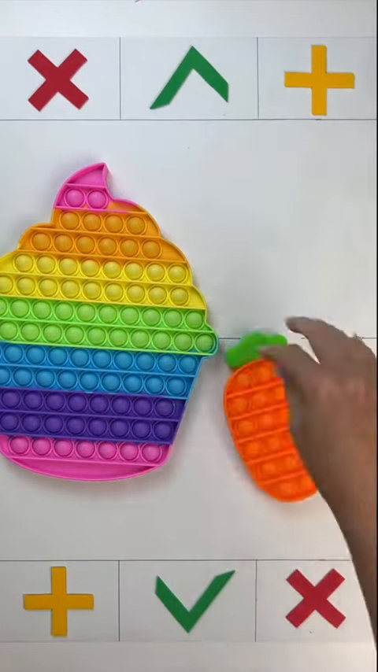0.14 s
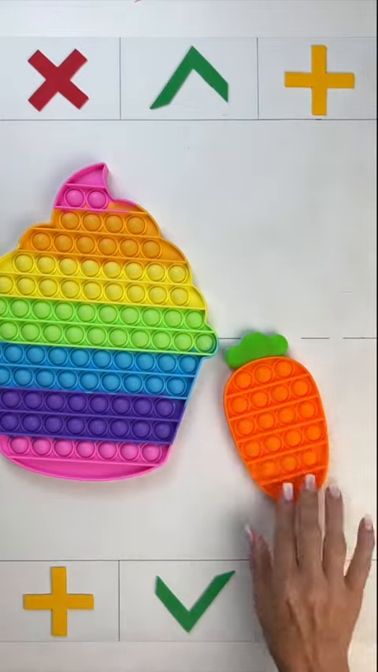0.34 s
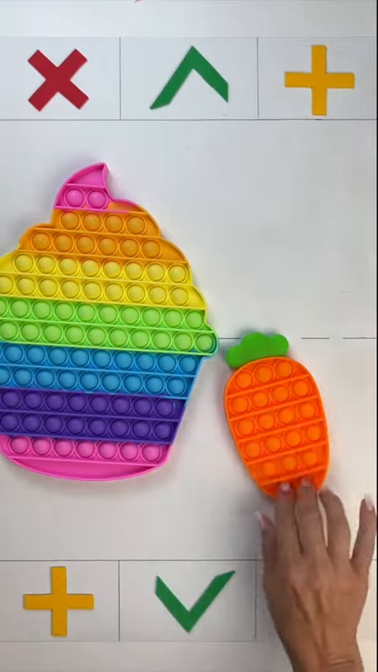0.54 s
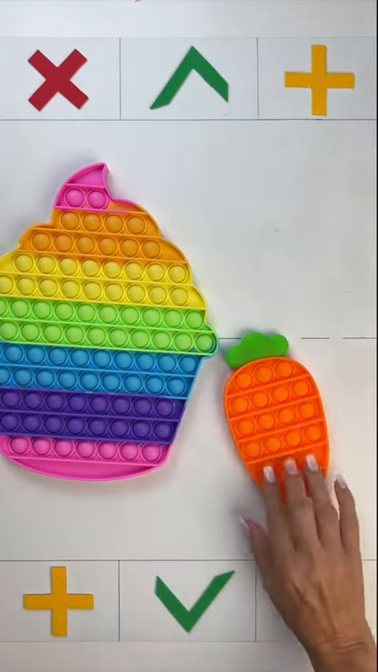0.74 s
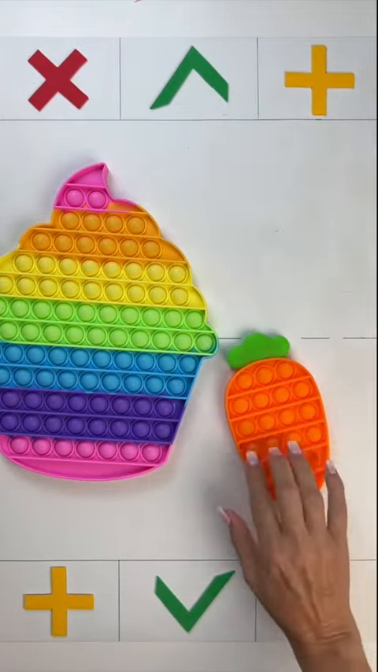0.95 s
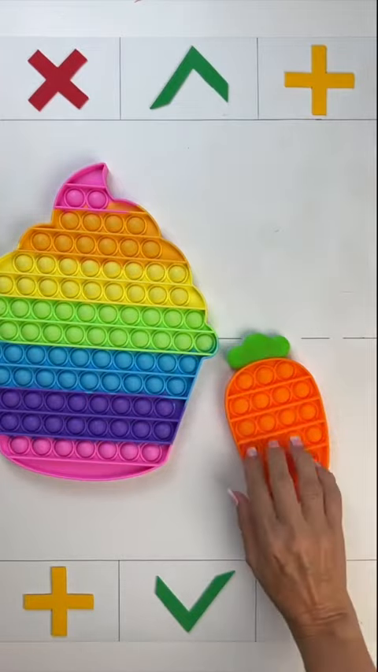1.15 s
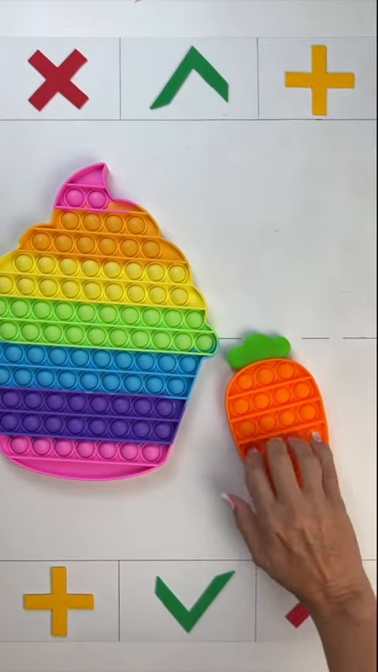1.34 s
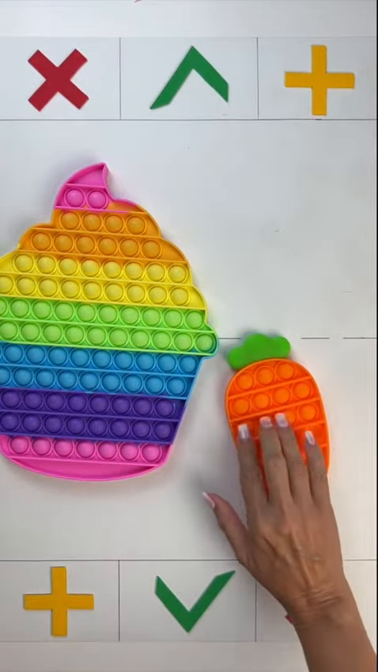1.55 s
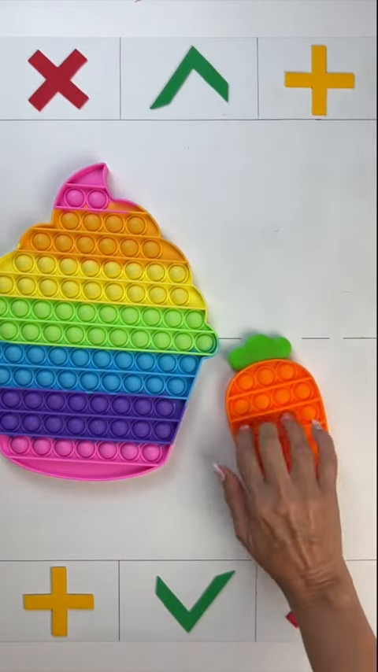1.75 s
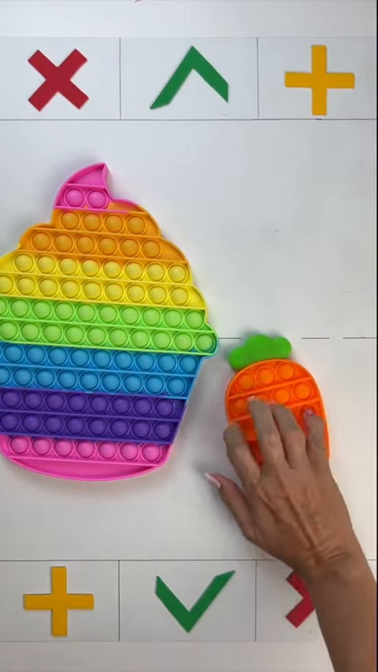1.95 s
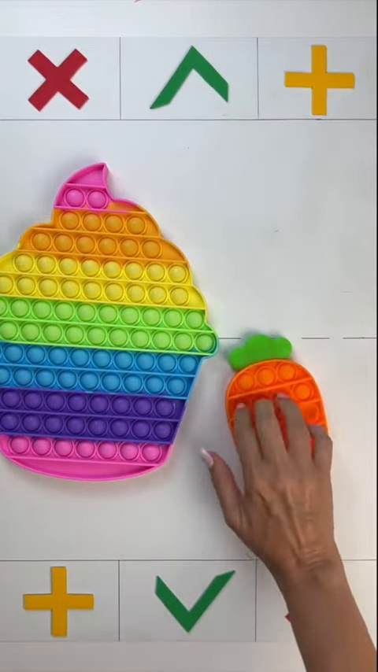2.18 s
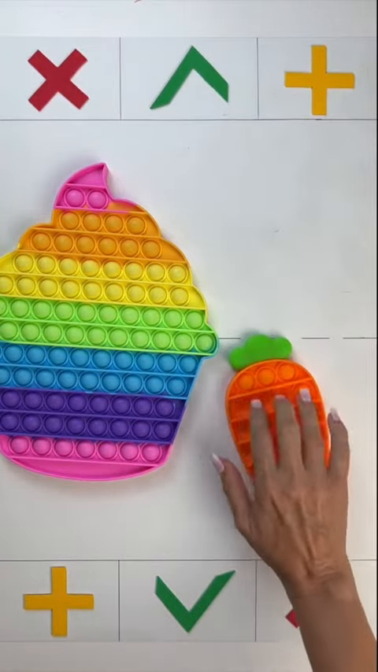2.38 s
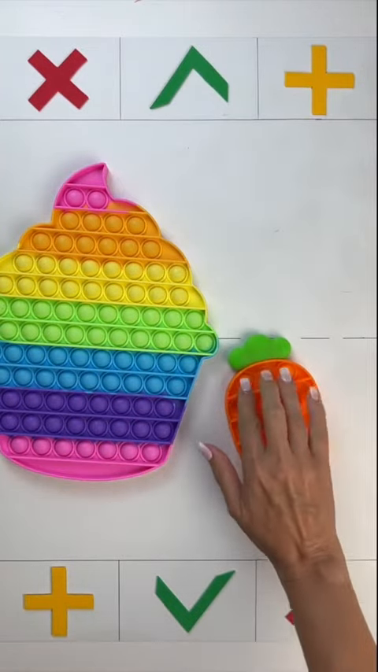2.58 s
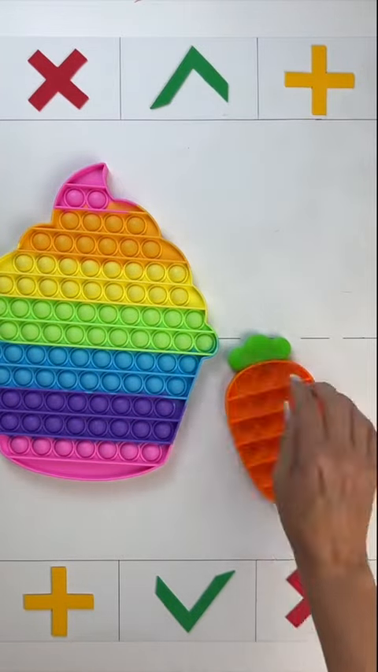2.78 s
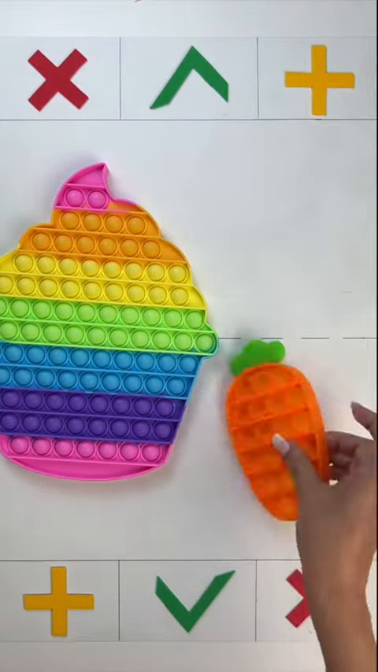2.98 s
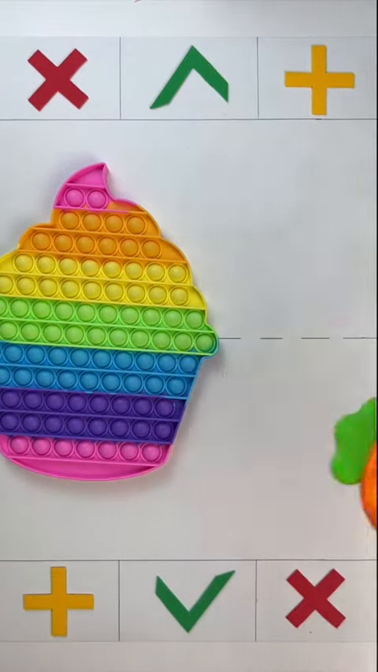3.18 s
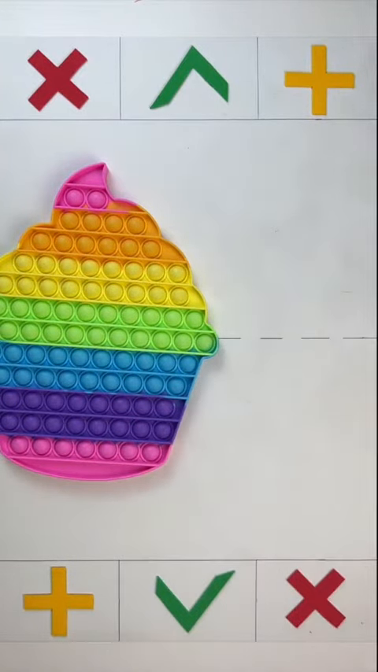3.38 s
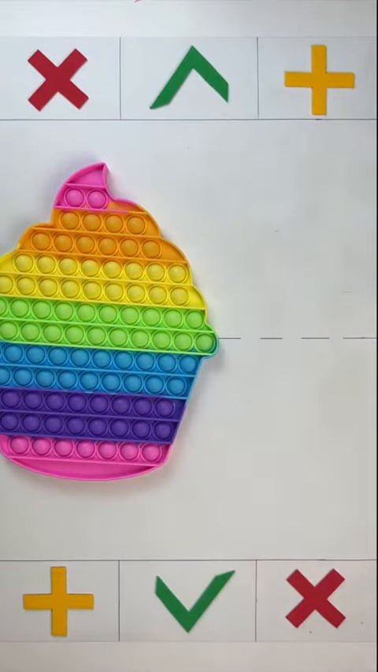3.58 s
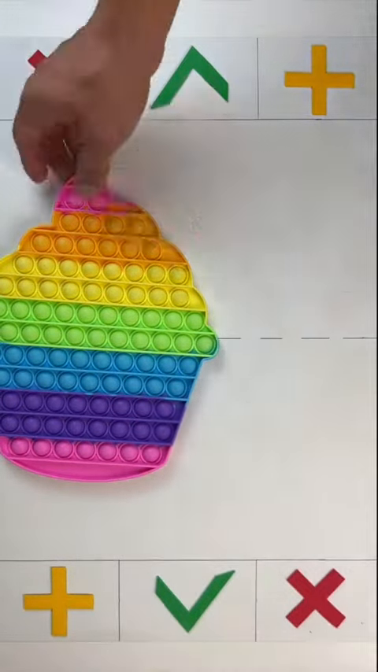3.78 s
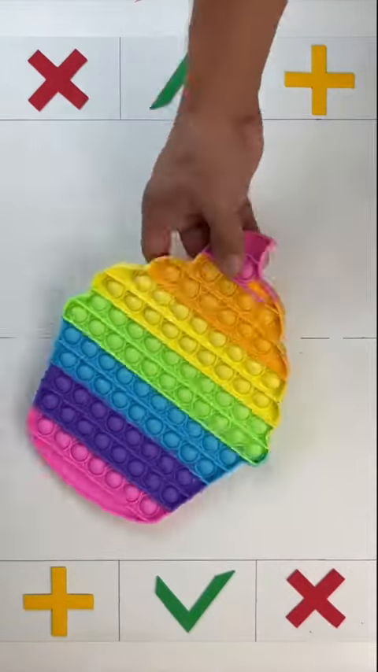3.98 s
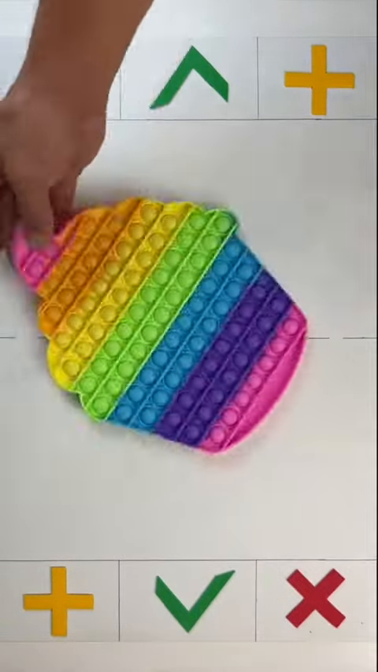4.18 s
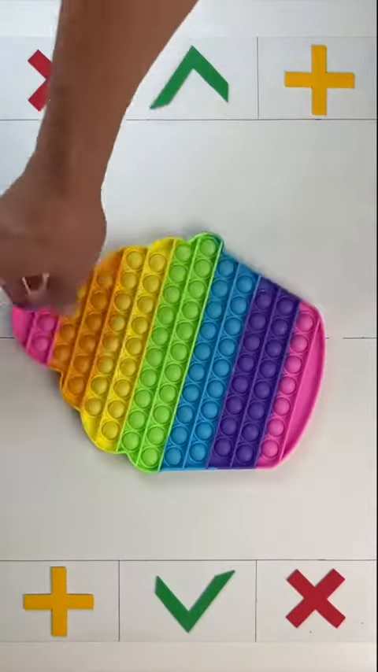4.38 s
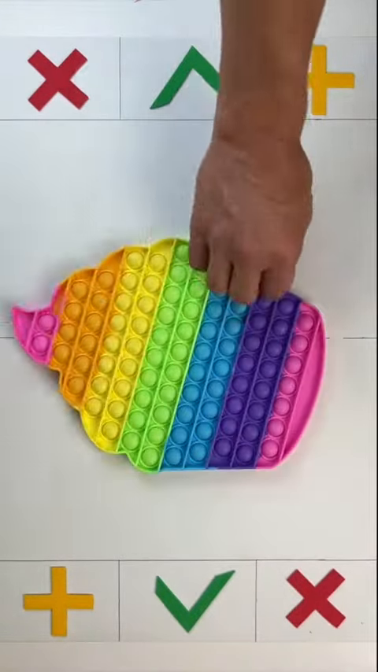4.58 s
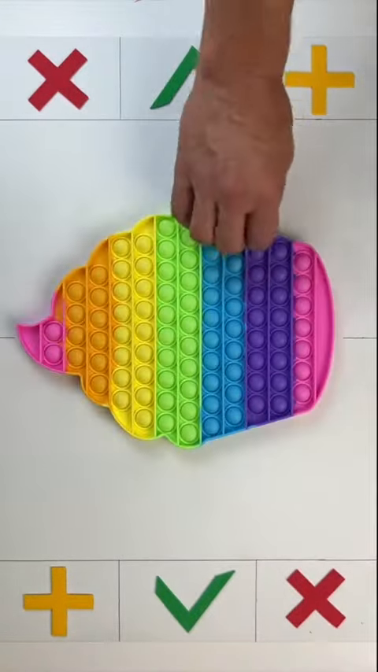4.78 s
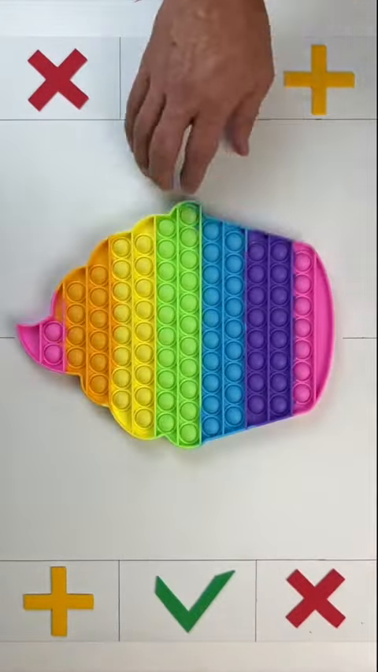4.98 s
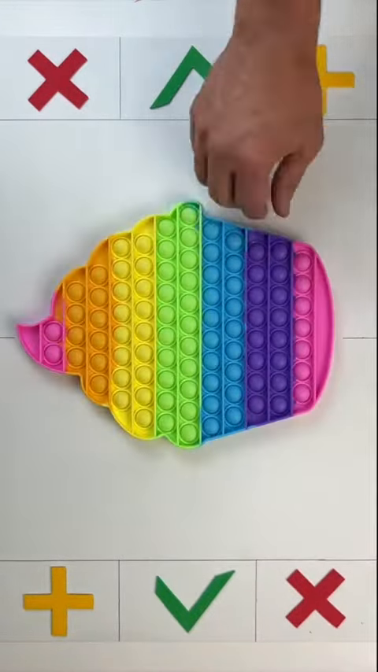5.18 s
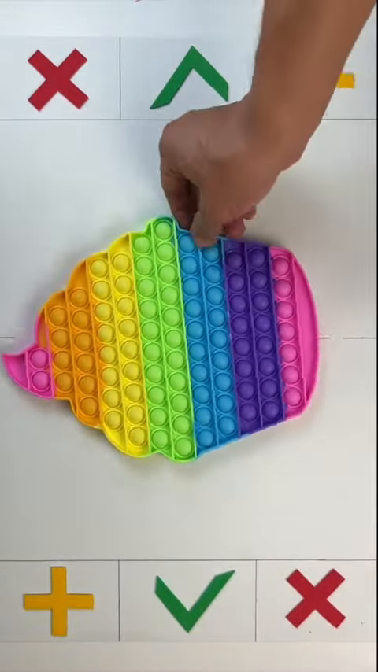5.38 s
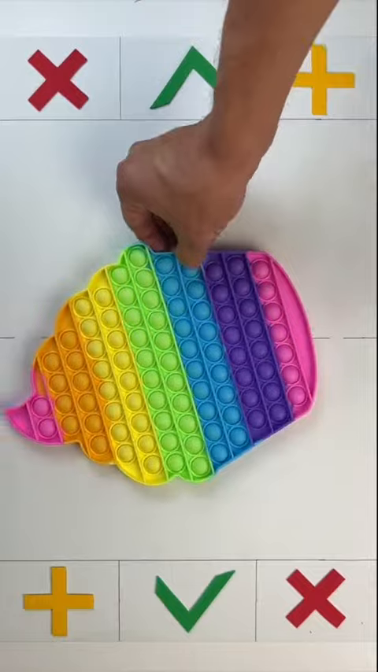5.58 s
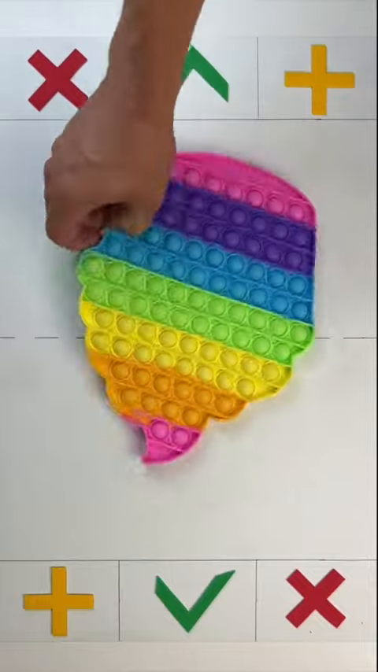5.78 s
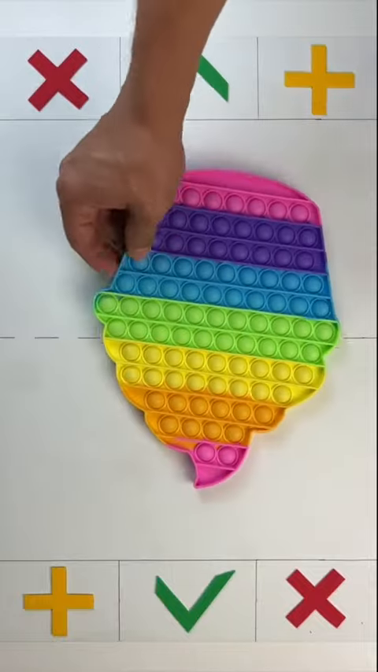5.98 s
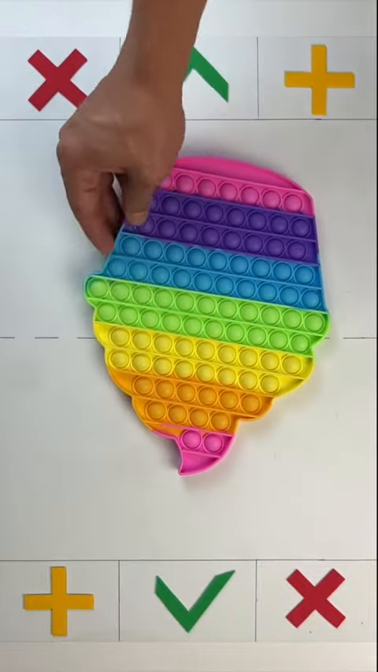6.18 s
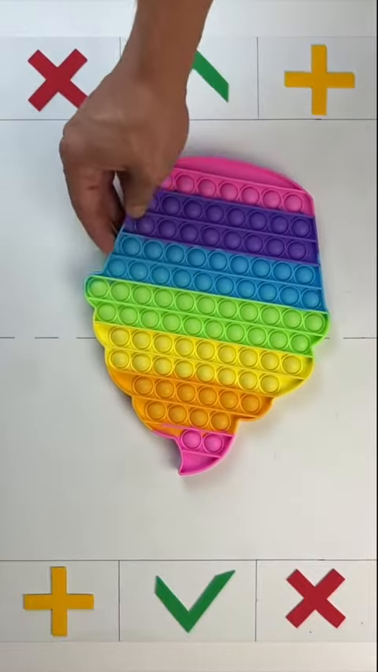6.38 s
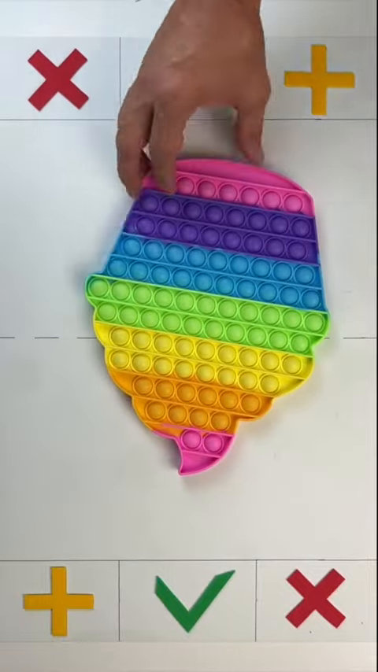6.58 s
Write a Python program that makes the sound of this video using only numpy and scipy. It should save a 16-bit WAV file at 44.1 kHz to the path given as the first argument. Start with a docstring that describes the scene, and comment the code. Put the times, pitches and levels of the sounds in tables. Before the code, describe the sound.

A low, wavering hum and soft air fill a small room throughout, heard from close above a table. At 0.03 s comes a snap, then at 0.1 s the small silicone toy lands with a loud smack. Bubbles pop from about 0.45 s, sharp and resonant with quick falling chirps: strong ones at 0.8, 1.15 (a tight cluster), 1.4, 1.7, 1.9, 2.2 and 2.4, ending with a double snap at 2.7. Faint fingertip pats fill the gaps, some with low puffs of air. Dull knocks and tiny nail ticks follow around 2.85-3.1, then near quiet. A soft brush at 3.6 leads to gritty rubber squeaks and swishes from 3.8 to 4.4, a hard knock at 4.37, weaker skids, and a thud at 4.8. After a pause, skids resume at 5.3, strongest near 5.6-5.7, fading by 6.2. A final firm double knock comes at 6.42, then hum.

```python
"""Bubble toy popped, a larger toy dragged

A silicone toy lands on a table and fingers pop its bubbles; then a larger toy is dragged round and let drop.
Each snap is a resonant burst that the table top smears into a quick falling chirp and colours with its modes.
Skids are uneven trains of stick-slip jerks; drags add grainy swishes, and filtered bursts make the knocks.
A small, diffusely echoing room with a low wavering hum and soft air surrounds a microphone above the table."""
import sys
import numpy as np
from scipy import signal
from scipy.fft import rfft, irfft
from scipy.io import wavfile
from scipy.ndimage import uniform_filter1d

SR = 44100
rng = np.random.default_rng(int(sys.argv[2]) if len(sys.argv) > 2 else 0)


def waveform_to_disk(signal):
    """Save audio, clipped to [-1, 1], as 16-bit WAV at the path in sys.argv[1]."""
    frames = np.transpose(np.atleast_2d(signal))
    scaled = np.clip(frames, -1, 1) * 32767
    samples = np.round(scaled).astype(np.int16)
    wavfile.write(sys.argv[1], SR, samples)


N = 292824

LEAD_S = 0.005  # room ahead of each snap for its earliest treble
SKID_FADE_S = 0.016  # margin at either end of a skid, in which it swells and dies away


def undb(db):
    """Decibels to amplitude factor."""
    return 10 ** (np.asarray(db) / 20)


def unit(x):
    """The same sound at rms 1."""
    return x / np.sqrt(np.mean(x ** 2) + 1e-18)


def bins(size):
    """Frequencies of a real FFT in Hz, kept above zero."""
    return np.maximum(np.fft.rfftfreq(size, 1 / SR), 1)


def colour(x, points):
    """Filter by a spectrum of (f/Hz, gain/dB) points, joined along log frequency."""
    hz, db = np.transpose(points)
    gain_db = np.interp(np.log(bins(len(x))), np.log(hz), db)
    return irfft(rfft(x) * undb(gain_db), len(x))


def resonance(f, hz, q):
    """Response of one damped resonance, 1 at its centre."""
    return 1 / (1 + 1j * q * (f / hz - hz / f))


def walk(rate, size):
    """Random wander with spread near 1: straight lines between `rate` random knots per second."""
    knots = rng.standard_normal(int(size * rate / SR) + 2)
    return np.interp(np.arange(size) * rate / SR, np.arange(len(knots)), knots)


def add(track, s, x):
    """Mix x into the track from time s on, trimming what falls outside."""
    start = int(s * SR)
    x = x[max(-start, 0):]
    start = max(start, 0)
    track[start:start + len(x)] += x[:len(track) - start]


def tabletop(x, ring_db, spot_db=2, load=0.019):
    """The table top passes a push on and rings; the spot sets each mode's share, the hand's load its pitch."""
    # modes of the table top with the toy on it: f/Hz, gain/dB (before the ring level), 60 dB decay time/s
    modes = [(140, -4, 0.31), (260.5, -2, 0.15), (263.7, 14.5, .13), (395, 12.5, 0.099), (768, 4.5, 0.047),
             (903, 3.5, 0.052), (1174, -4.5, 0.077), (1446, 0.5, 0.039), (1678, -4.5, .08),
             (1731, -9, 0.11), (1881, -9.5, 0.092), (2670, 4, 0.11), (3340, -2, 0.036)]
    t = np.arange(SR // 4) / SR
    ring = np.zeros(len(t))
    for hz, db, t60 in modes:
        spot, shift = rng.standard_normal(2)
        decay = np.log(1000) / t60
        share = undb(db + ring_db + spot_db * spot) * 2 * decay / SR
        loaded_hz = hz * (1 + load * shift)
        ring += share * np.exp(-decay * t) * np.cos(2 * np.pi * loaded_hz * t)
    ring[0] += 1  # the push itself
    return signal.fftconvolve(x, ring)


def room(x, gap_s=0.0058, t60_s=0.3, early_db=7, early_s=0.012, wet_db=-1):
    """Strong near reflections, then a short diffuse tail, its width set per frequency; stereo out."""
    # spectrum of the echo: f/Hz, mid level/dB (before the wet level), side minus mid/dB
    echo_colour = [(99, 1, -25), (294, -10, -37), (580, -10.5, -19.5), (1126, -8.5, -5), (2260, -11, 3),
                   (5030, -8.5, -11), (9300, -8, -0.5), (15000, -9.5, -1)]
    size = SR // 2
    t = np.arange(size) / SR
    tail = np.exp(-np.log(1000) * t / t60_s)
    early = undb(early_db) * np.exp(-t / early_s)
    fade = (t > gap_s) * tail * (1 + early)
    mid = colour(rng.standard_normal(size), [(hz, db) for hz, db, _ in echo_colour])
    side = colour(rng.standard_normal(size), [(hz, db + side_db) for hz, db, side_db in echo_colour])
    echo = undb(wet_db) * fade / np.linalg.norm(fade) * np.array([mid + side, mid - side])
    return x + signal.fftconvolve(x[None], echo, axes=1)[:, :len(x)]


def background(waver_db=3, drift=0.053, side_db=-20, air_db=-52.5):
    """Hum partials wander in pitch and level over the soft, nearly mono air noise of the room."""
    # partials of the hum: f/Hz, rms level/dB
    hum_partials = [(141, -50.5), (237, -63), (301, -58), (400, -66.5)]
    # spectrum of the room air: f/Hz, relative level/dB
    air_colour = [(15, -65.5), (25, -38.5), (111, -11.5), (145, -2), (206, -21), (301, -10), (373, -29),
                  (405, -18.5), (1700, -43), (3250, -41), (16000, -56.5)]
    hum = np.zeros(N)
    for hz, db in hum_partials:
        phase = 2 * np.pi * np.cumsum(hz * (1 + drift * walk(25, N))) / SR
        hum += undb(db) * unit(np.sin(phase) * undb(waver_db * walk(11, N)))
    mid = unit(colour(rng.standard_normal(N), air_colour))
    side = unit(colour(rng.standard_normal(N), air_colour))
    air = mid + undb(side_db) * side * np.array([[1], [-1]])
    return hum + undb(air_db) * air


def pop(hz, thump_db, crack_db, size=4096, q=1.65, soft=2.63, slap_db=-5, slap_s=0.0024,
        snap_spread=0.07864, thump_spread=0.22, thump_hz=480, thump_q=0.62, puff_db=-14, puff_hz=75,
        knee_hz=250, front_hz=3500, crinkle_db=-7, crinkle_s=0.0056, crack_s=0.004):
    """A dome flips: a snap with slap and crinkle of tiny slips, a thump, a puff of air and a fine crack."""
    # spectrum of the crack: f/Hz, relative level/dB
    crack_colour = [(500, -16.5), (2000, 2), (4000, 6), (6500, -3), (10500, -6), (12500, -4), (15500, -6.5)]
    f, t = bins(size), np.arange(size) / SR
    # bending waves: travel time falls as about 1 / sqrt(f), so the treble arrives first
    bend = -2j * np.pi * (2 * np.sqrt(f + knee_hz) - f / np.sqrt(front_hz + knee_hz))

    slips = rng.standard_normal(size) ** 3 * np.exp(-t / crinkle_s)
    crinkle = undb(crinkle_db) * rfft(slips) / np.linalg.norm(slips)
    # the dome slaps the table an instant later; the gap gives each pop its own colour
    gap_s = slap_s * (0.5 + rng.random())
    slap = undb(slap_db) * np.exp(-2j * np.pi * f * gap_s)
    push = 1 + slap + crinkle

    # the snap comes almost straight from the dome; a lower one is also softer
    edge = f / (soft * hz)
    snap = resonance(f, hz, q) / (1 + 1j * edge - edge ** 2) / (1 + 1j * f / (2 * hz))
    snap = snap * np.exp(snap_spread * bend)
    # the thump has crossed the table top
    thump = resonance(f, thump_hz, thump_q) / (1 + 1j * f / hz) ** 2 * np.exp(thump_spread * bend)
    puff = undb(puff_db) * resonance(f, puff_hz, 0.93) ** 2

    spectrum = snap * push + undb(thump_db) * (thump + puff)
    wave = irfft(spectrum * np.exp(-2j * np.pi * f * LEAD_S)) / np.abs(irfft(snap)).max()
    crack = unit(colour(rng.standard_normal(size) ** 3, crack_colour))
    crack = crack * (t > LEAD_S) * np.exp(-np.abs(t - LEAD_S) / crack_s)
    return wave + undb(crack_db - 1) * crack


def strike(db, hz, thump_db, crack_db, ring_db=0):
    """One flip or knock at a given level, heard through the table top."""
    return undb(db) * tabletop(pop(hz, thump_db, crack_db), ring_db)


def pops(level_db=-2):
    """Landing, bubbles and follow-on snaps: a soft click, a slip and the snap itself, each event with its own echo."""
    # the toy landing (at .1075 s), bubbles snapping through and their follow-on snaps:
    # snap t/s, level/dB (before the layer level), snap centre f/Hz,
    # thump and crack/dB relative to the snap (the crack before a trim), lead of the soft click/s
    snaps = [(0.0328, -9, 1400, -0.5, -24, 0.0033), (.1075, 4.5, 1300, 1.5, -17, 0.0038),
             (.443, -16, 2050, 5.5, -11.5, 0.0015), (0.4892, -8.5, 2180, 1.5, -9, 0.021),
             (.7888, 0.5, 1970, -1.5, -12, 0.016), (0.7997, -3.5, 1460, -2.5, -10, 0.0036),
             (1.139, -15.5, 1150, 6, -20, 0.0072), (1.148, -3.5, 1740, -1.5, -8, 0.0069),
             (1.1542, -2.5, 1920, 0.5, -14, 0.011), (1.1644, -5.5, 1580, -7.5, -8, 0.00031),
             (1.383, -1, 2526, -6.5, -15, 0.023), (1.6679, 1.5, 1790, -5, -10, .0135),
             (1.9293, -5, 1950, -10, -14.5, 0.02), (2.169, -11, 1670, -11.5, -9, .0065),
             (2.175, 1, 1860, -0.5, -12.5, 0.0037), (2.18, -1.5, 1860, -3, -8.5, 0),
             (2.419, 2.5, 1990, -6, -12, 0.0097), (2.6789, -5.5, 1620, 6.5, -4.5, 0.0078),
             (2.6903, 0, 1600, -5, -12, 0.0059)]
    lead_in_s = 0.05  # time kept before each snap for the click, in a bubble the start of its buckling
    click_db, click_under_db, click_hz = -18.5, -8.5, 1350  # usual level, highest relative to the snap
    slip_s, slip_db = 0.0045, -19.5  # longest lead of the slip, its level relative to the snap
    out = np.zeros((2, N))
    snap_s = lead_in_s - LEAD_S
    for s, db, hz, thump_db, crack_db, click_s in snaps:
        soft_db = min(click_db, db + click_under_db) + level_db
        click = strike(soft_db, click_hz, thump_db=-2, crack_db=-22.5)
        slip = strike(db + slip_db + level_db, hz, thump_db=-13, crack_db=-8.5)
        snap = strike(db + level_db, hz, thump_db, crack_db)
        event = np.zeros(SR // 2)
        add(event, snap_s - click_s, click)
        add(event, snap_s - min(slip_s, click_s), slip)
        add(event, snap_s, snap)
        for channel, heard in zip(out, room(event)):
            add(channel, s - lead_in_s, heard)
    return out


def whumps(size=4096, hz=42, q=1.1):
    """The landing and a few of the presses push air from under the toy: a slow, heavily damped low swing."""
    # air pushed out at the microphone: t/s, peak level/dB
    air_pushes = [(0.106, -35.5), (0.791, -42.5), (2.173, -30.5), (2.688, -40)]
    out = np.zeros(N)
    wave = irfft(resonance(bins(size), hz, q) ** 2)
    for s, db in air_pushes:
        add(out, s, undb(db) * wave / np.abs(wave).max())
    return out


def touches(top_db=-45, range_db=6, hz=850, thump_db=0, crack_db=-24, count=22):
    """Fingertips pat and shift on the small toy: faint pops at random times, over an octave of pitch."""
    from_s, to_s = 0.2, 2.95  # when the fingers rest on the toy
    out = np.zeros(N)
    for place, size, pitch in rng.random((count, 3)):
        pat = tabletop(pop(hz * 2 ** (pitch - 0.5), thump_db, crack_db), ring_db=0)
        add(out, from_s + (to_s - from_s) * place, undb(top_db + range_db * (size - 1)) * pat)
    return out


def knocks(level_db=-2):
    """Fingers and toys knock dully on the table, and nails tick brightly: pop bursts ringing the table top."""
    # knocks: t/s, level/dB (before the layer level), centre f/Hz,
    # thump and crack/dB relative to the knock (the crack before a trim)
    table_knocks = [(.265, -29, 885, -1, -19.5), (0.646, -37, 860, 3.5, -18), (.958, -33, 830, 2, -13),
                    (1.504, -35, 794, 8, -30), (1.877, -44, 794, 8.5, -21), (2.006, -35, 1170, 6.5, -10),
                    (2.0307, -17.5, 844, -2, -21), (2.834, -28, 584, 14.5, -8),
                    (2.852, -20.5, 1300, 4.5, -19), (3.354, -46, 1530, 9, -2.5),
                    (4.3657, -4.5, 1527, -9, -33.5), (4.783, -12, 1014, -1.5, -14),
                    (5.2247, -35, 700, 13, -8.5), (6.4228, -14, 1232, -22.5, -31),
                    (6.4255, -5.5, 1047, -2, -16), (6.608, -50, 2064, -15, 3)]
    # fingernails as the small toy is picked up: t/s, level/dB (before the layer level)
    nail_ticks = [(2.949, -30.5), (3.0605, -35), (3.1, -38)]
    out = np.zeros(N)
    for s, db, hz, thump_db, crack_db in table_knocks:
        add(out, s - LEAD_S, strike(db + level_db, hz, thump_db, crack_db))
    for s, db in nail_ticks:
        add(out, s - LEAD_S, strike(db + level_db, hz=3800, thump_db=-7, crack_db=-35))
    return out


def skid(length, start_hz, end_hz, bright_hz, rough, jitter=0.1718, blur=0.33, scatter_db=7, q=1.77,
         soft=1.97, grit=0.92, edge_s=0.0084, flap_hz=230, flap_db=-8, count=14):
    """Stick and slip: a short train of jerks whose spacing and size grow uneven with roughness."""
    n = int((length + 2 * SKID_FADE_S) * SR)
    t = np.arange(n) / SR - SKID_FADE_S
    rate = np.interp(t, [0, length], [start_hz, end_hz]) * np.exp(jitter * rough * walk(150, n))
    # each jerk comes a little early or late, which smears the high overtones
    phase = 2 * np.pi * np.cumsum(rate) / SR + blur * walk(600, n)
    jerks = unit(sum(np.cos(k * phase) / np.hypot(1, k / 4) for k in range(1, count + 1)))
    # other patches of the rim catch out of step, and shake the whole floppy toy
    patches = 2 * grit * np.sqrt(abs(rough)) * unit(rng.standard_normal(n) ** 3)
    swell = (1 + np.tanh(t / edge_s)) * (1 + np.tanh((length - t) / edge_s))
    swell = swell * undb(scatter_db * rough * walk(216.9, n))

    f = bins(2 * n)
    rubber = resonance(f, bright_hz, q) / (1 + 1j * f / (soft * bright_hz)) ** 2
    flap = undb(flap_db) * resonance(f, flap_hz, 1) ** 2
    rim = rfft((jerks + patches) * swell, 2 * n) * rubber
    body = rfft(patches * swell, 2 * n) * flap
    wave = irfft(rim + body)
    return wave / np.sqrt(np.sum(wave ** 2) / (length * SR))  # rms 1 over the nominal length


def skids(level_db=-3, ring_db=-9, grain_db=5):
    """Short squeaky skids with a gritty hiss: each sags in pitch, and the harder ones are brighter."""
    # rubber catching on the table: t/s, length/s, level/dB (before the layer level),
    # mean slip rate f/Hz (before jitter), roughness/0-1
    catches = [(2.978, 0.013, -26.5, 1145, 0.03), (3.792, 0.059, -18, 419.4, 0.29),
               (3.846, .057, -18.5, 333.8, 0.62), (3.933, 0.019, -18, 477, 0.21),
               (3.974, 0.02, -14, 757.5, 0.27), (4.004, 0.017, -13.5, 460, 0.42),
               (4.116, 0.016, -13, 428.8, 0.52), (4.141, 0.012, -19, 785, 0.22),
               (4.203, 0.013, -25, 896, 0.14), (4.245, 0.0337, -15.5, 443.4, 0.41),
               (4.283, .013, -10.5, 529, 0.03), (4.386, 0.038, -20, 339, 0.63),
               (4.609, 0.038, -33, 487, 0.56), (4.657, 0.03, -23, 420.2, 0.54),
               (4.679, 0.014, -24, 346, 0.53), (5.302, 0.039, -35.5, 553, 0.25),
               (5.38, 0.0097, -19, 459, 0.07), (5.407, 0.018, -29.5, 457.5, 0.33),
               (5.468, .026, -36, 385, 0.26), (5.583, .107, -21.5, 383.2, 0.51),
               (5.616, 0.0945, -13.5, 403.7, .24), (5.711, 0.056, -28.5, 576, 0.35),
               (5.803, 0.0177, -22.5, 714, 0.21), (5.833, 0.037, -23.5, 657, 0.25),
               (5.978, 0.066, -28, 521, 0.47), (6.012, .032, -23.5, 505, .05),
               (6.158, 0.031, -44, 660, 0.1)]
    # spectrum of the hiss: f/Hz, relative level/dB
    hiss_colour = [(1500, -25), (3000, 1.5), (5000, 11.5), (7500, -16), (15000, -22)]
    ref_bright_hz, ref_db, bright_oct_per_db = 1340, -22, 0.0459  # brightness centre against level
    # share of the slip rate lost as the stretched rubber relaxes, at the reference rate; higher squeaks lose more
    ref_sag, sag_ref_hz = 0.0589, 502
    hiss_db = -20  # relative to the squeak, at the reference brightness
    out = np.zeros(N)
    for s, length, db, hz, rough in catches:
        bright_hz = ref_bright_hz * 2 ** (bright_oct_per_db * (db - ref_db))
        sag = ref_sag * hz / sag_ref_hz
        squeak = skid(length, hz * (1 + sag / 2), hz * (1 - sag / 2), bright_hz, rough)
        size = len(squeak)
        grit = unit(colour(rng.standard_normal(size), hiss_colour) * undb(grain_db * walk(400, size)))
        envelope = uniform_filter1d(np.abs(squeak), size=64)
        hiss = undb(hiss_db) * bright_hz / ref_bright_hz * grit * envelope
        add(out, s - SKID_FADE_S, undb(db + level_db) * tabletop(squeak + hiss, ring_db))
    return out


def pull(length, size, attack_s=0.018, release_s=0.061):
    """Speed of one movement of the hand: attack, hold, release."""
    t = np.arange(size) / SR
    return np.clip(t / attack_s, 0, 1) * np.clip((length - t) / release_s, 0, 1)


def swish(length, grain_db=1.5):
    """Fine grainy friction during one movement: coloured noise that follows the speed of the hand."""
    # spectrum of the friction: f/Hz, relative level/dB
    swish_colour = [(300, -1), (1500, 2.5), (4000, 1), (6000, 4), (8000, -5), (11000, -4.5), (15000, -10)]
    size = int(length * SR)
    friction = unit(colour(rng.standard_normal(size), swish_colour))
    return friction * undb(grain_db * walk(543, size)) * pull(length, size)


def drags(ring_db=-3, judder_hz=392):
    """The dragged toy swishes and its rim judders in stick-slip; the hand alone only swishes."""
    # the hand brushing over the toy as it takes hold and lets go: t/s, length/s, level/dB (before the speed curve)
    brushes = [(3.558, 0.19, -65), (3.702, 0.12, -55.5), (4.902, 0.2, -62.5)]
    # pulls of the large toy: t/s, length/s, swish level/dB and judder level/dB (before the speed curve)
    pulls = [(3.773, 0.37, -52.5, -35.5), (4.047, 0.33, -51.5, -32), (4.37, 0.08, -39.5, -24.5),
             (4.429, 0.13, -58, -42), (4.598, .19, -56, -44.5), (5.286, 0.28, -60, -53),
             (5.594, .18, -45, -31.5), (5.789, 0.16, -63, -43)]
    out = np.zeros(N)
    for s, length, db in brushes:
        add(out, s, undb(db) * swish(length))
    for s, length, swish_db, judder_db in pulls:
        judder = skid(length, judder_hz, judder_hz, bright_hz=1180, rough=0.663)
        judder = judder * pull(length, len(judder))
        add(out, s, undb(judder_db) * tabletop(judder, ring_db))
        add(out, s, undb(swish_db) * swish(length))
    return out


def scene():
    """Pops, touches, knocks, skids and drags sound in the humming room; the whumps reach the microphone dry."""
    handling = room(touches() + knocks())
    dragging = room(skids() + drags())
    return background() + pops() + whumps() + handling + dragging


def record(dry):
    """The microphone's electronics flatten the loudest peaks, then a steep low-pass cuts the top."""
    rounded = dry / (1 + dry ** 6) ** (1 / 6)
    low_pass = signal.ellip(8, 0.2, 70, 16000, fs=SR, output="sos")  # order, ripple/dB, stop/dB, cutoff/Hz
    return signal.sosfilt(low_pass, rounded)


dry = scene()
out = record(dry)
waveform_to_disk(out)
```